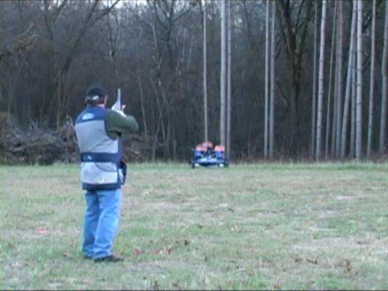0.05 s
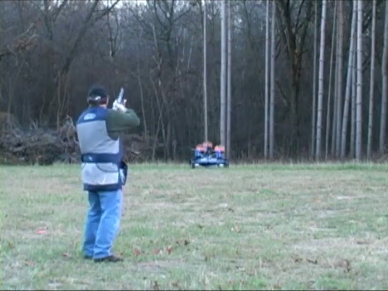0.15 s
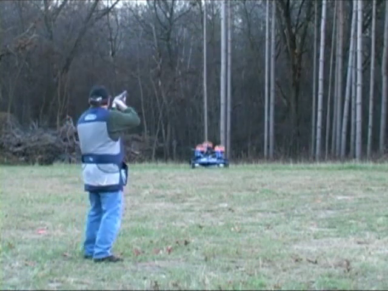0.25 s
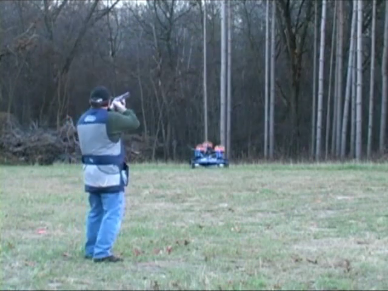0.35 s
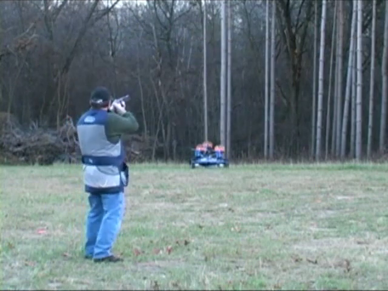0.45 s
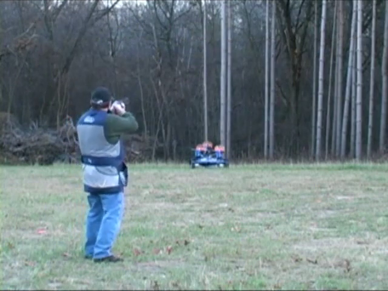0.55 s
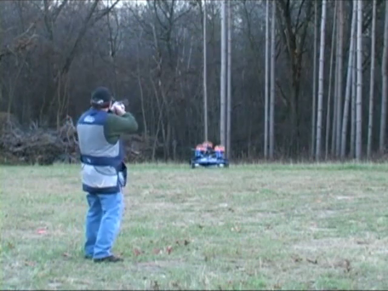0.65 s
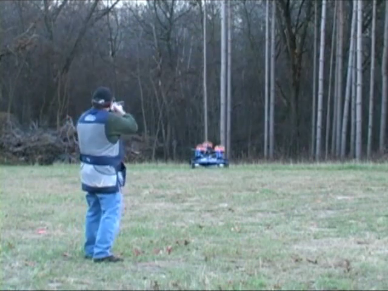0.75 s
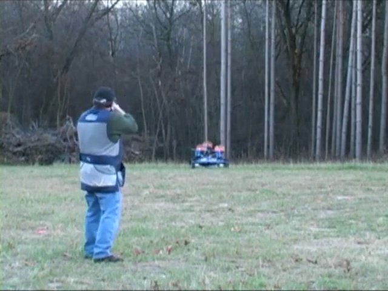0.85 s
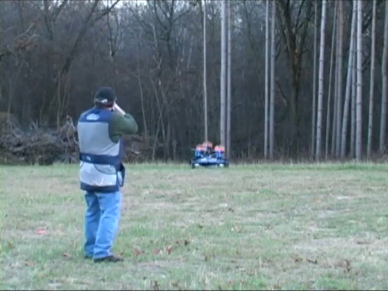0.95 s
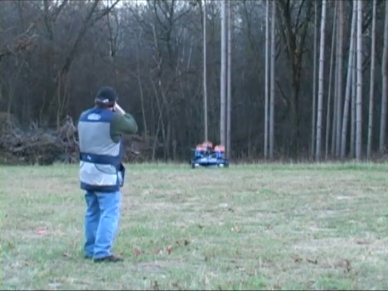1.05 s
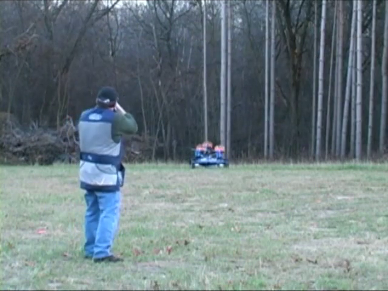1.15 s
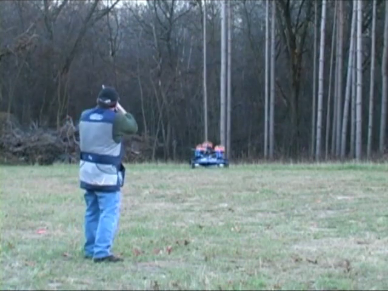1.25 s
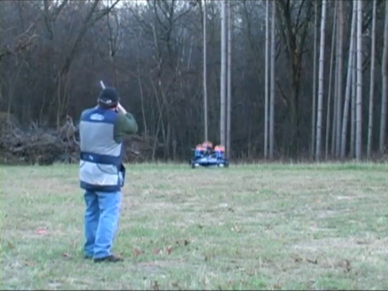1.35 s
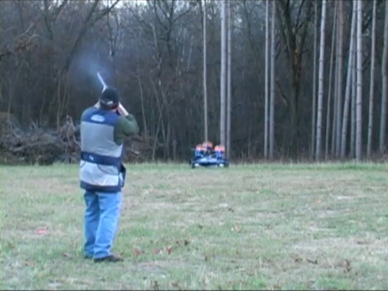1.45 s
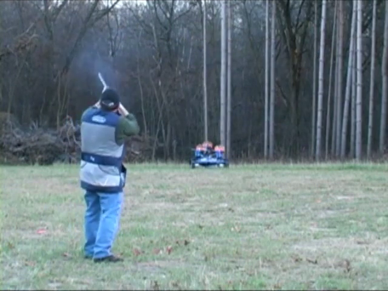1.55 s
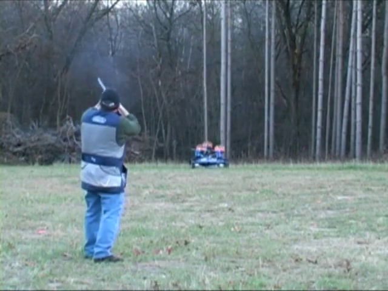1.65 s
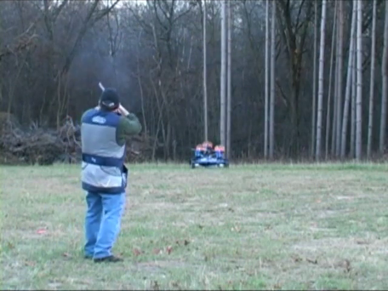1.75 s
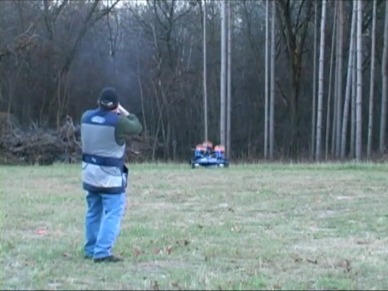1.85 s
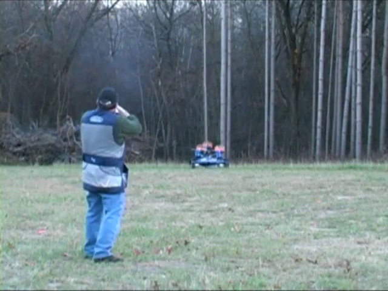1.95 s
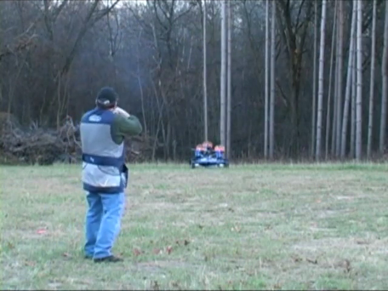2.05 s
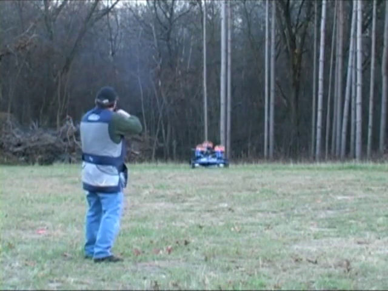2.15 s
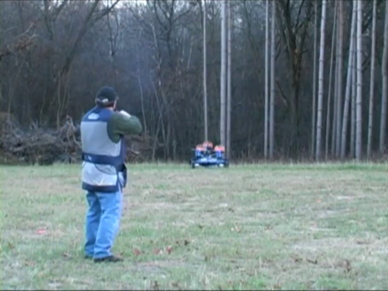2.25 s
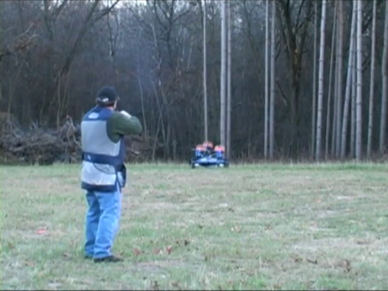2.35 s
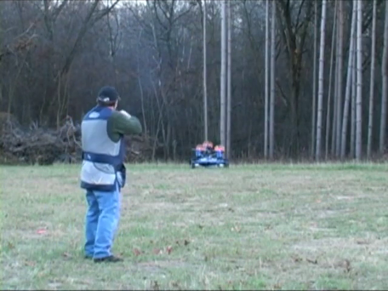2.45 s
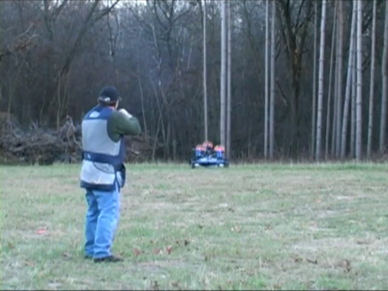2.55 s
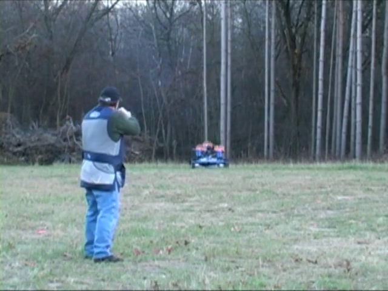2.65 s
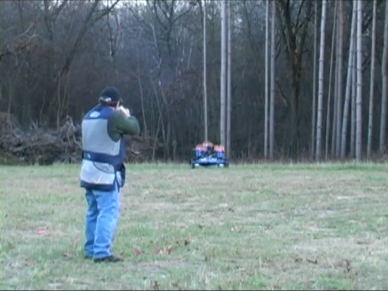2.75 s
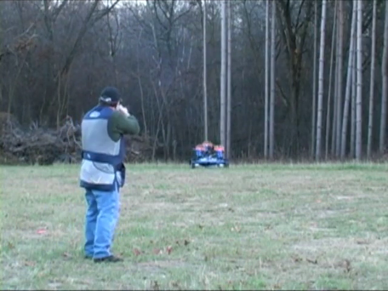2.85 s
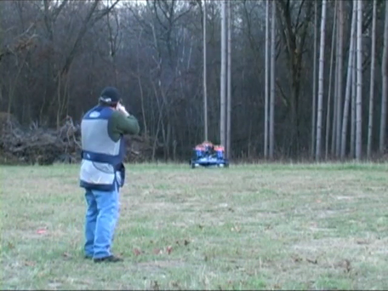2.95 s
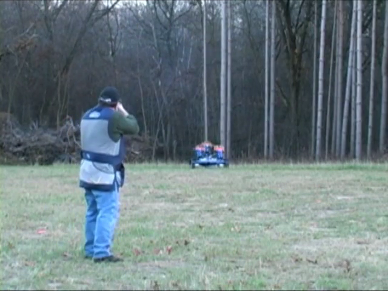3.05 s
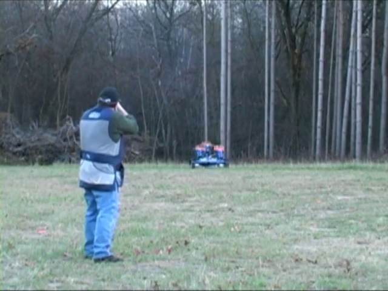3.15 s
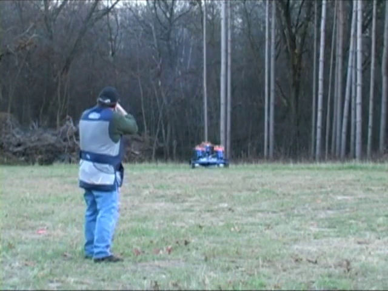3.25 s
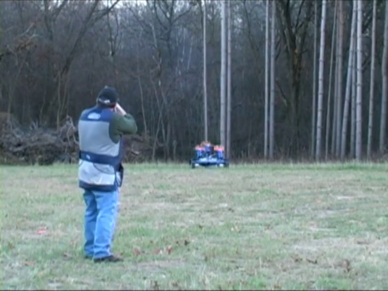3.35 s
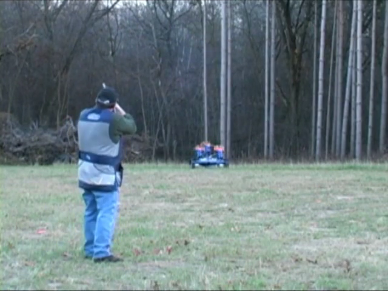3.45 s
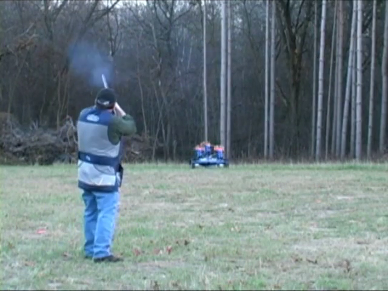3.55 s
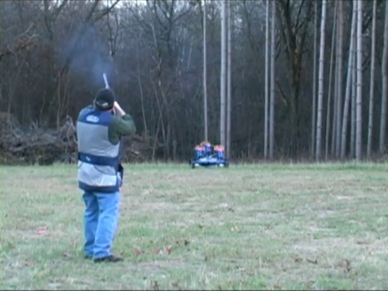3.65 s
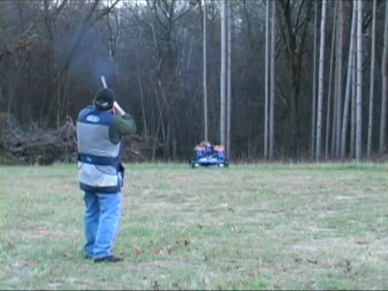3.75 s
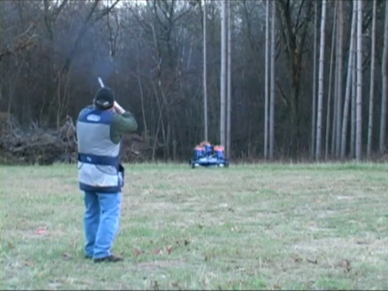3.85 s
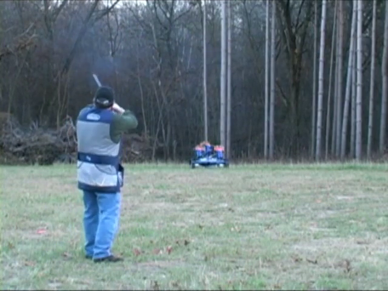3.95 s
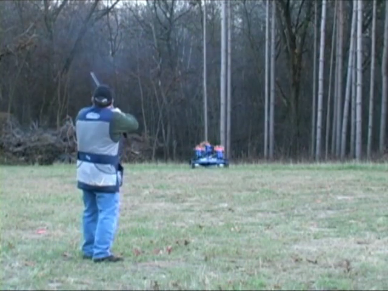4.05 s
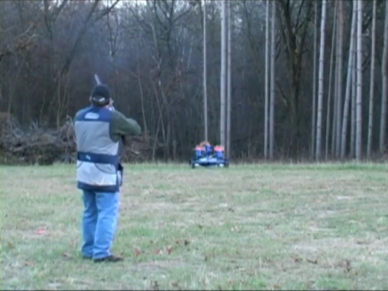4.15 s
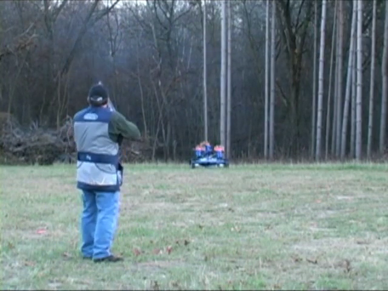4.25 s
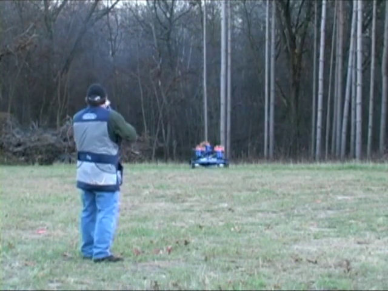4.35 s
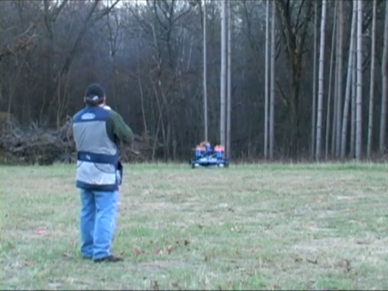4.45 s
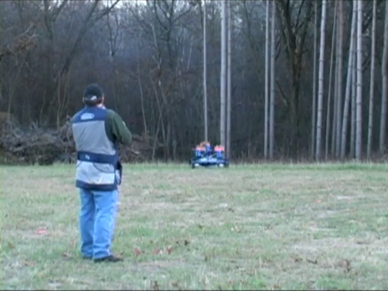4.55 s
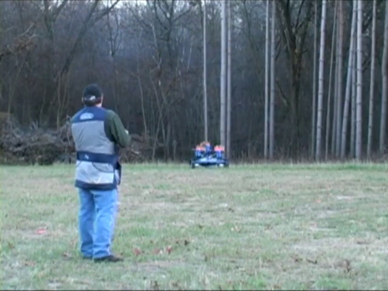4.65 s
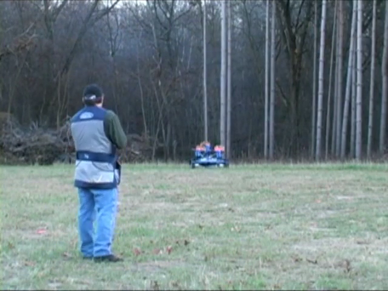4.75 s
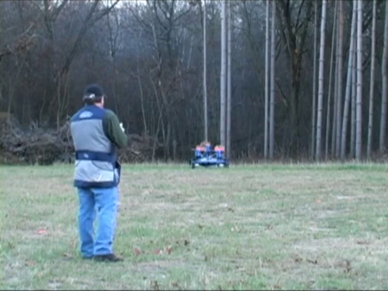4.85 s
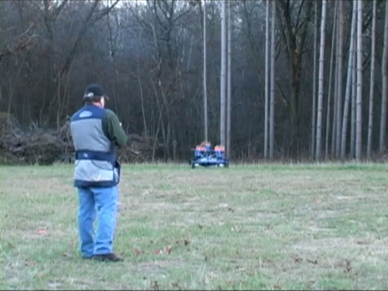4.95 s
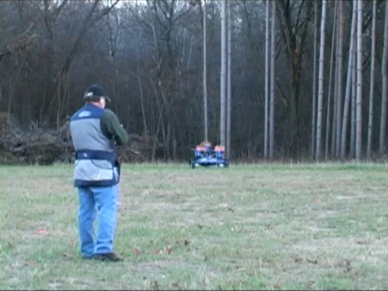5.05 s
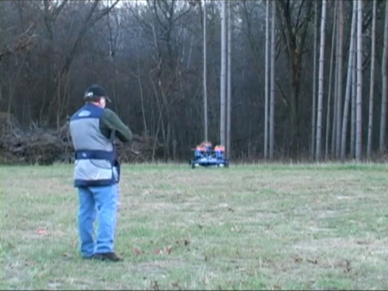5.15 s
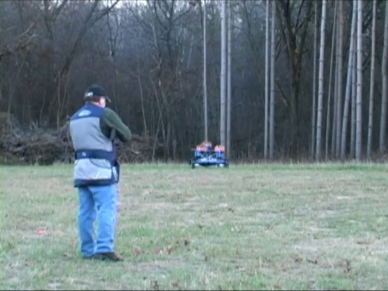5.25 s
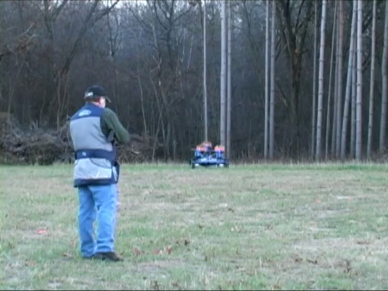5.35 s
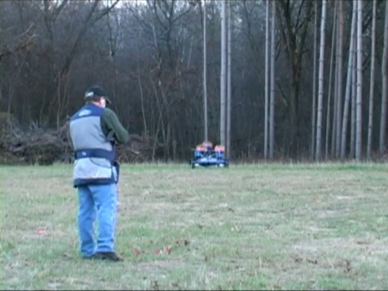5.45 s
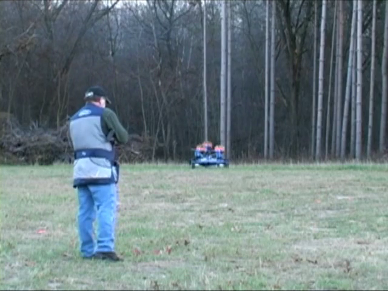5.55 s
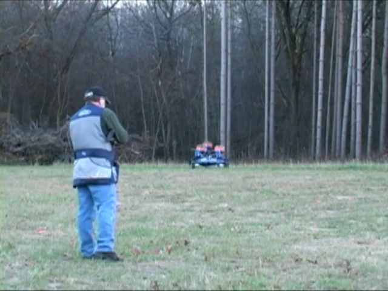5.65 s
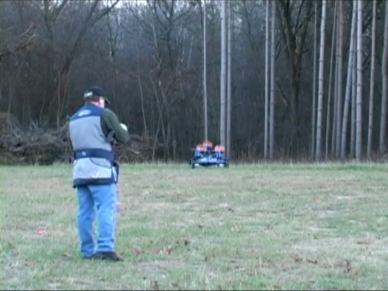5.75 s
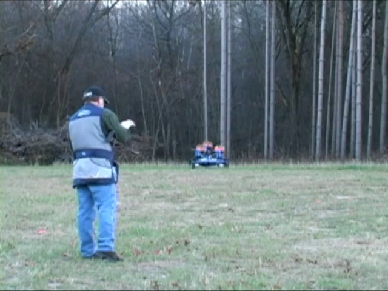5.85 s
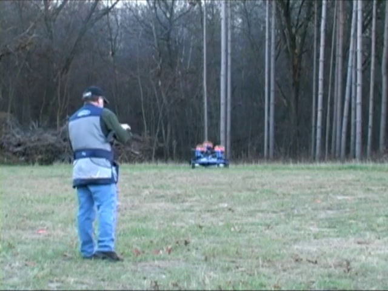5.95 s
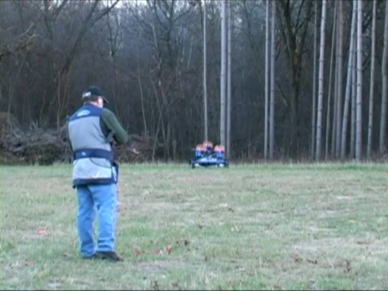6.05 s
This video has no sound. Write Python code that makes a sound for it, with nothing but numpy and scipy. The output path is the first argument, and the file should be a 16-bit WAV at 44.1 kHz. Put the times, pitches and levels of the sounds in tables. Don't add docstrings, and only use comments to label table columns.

```python
import sys
import numpy as np
from scipy import signal
from scipy.fft import rfft, irfft, next_fast_len
from scipy.io import wavfile
from scipy.ndimage import uniform_filter1d

SR = 44100
rng = np.random.default_rng(int(sys.argv[2]) if len(sys.argv) > 2 else 0)


def put_to_file(sound):
    columns = np.atleast_2d(sound).T
    safe = np.clip(columns, -1, 1)
    whole_steps = np.round(safe * 32767)
    wavfile.write(sys.argv[1], SR, whole_steps.astype(np.int16))


def boost(x):
    u = np.asarray(x, float) / 20
    return 10 ** u


N = 269391

# [t/s, blast level/dB, ring before it/dB, length of that ring/s]
SHOTS = [
    (1.5147, 1.5, -16.5, 0.0047),
    (3.6271, -3.5, -1.5, 0.0025),
]
# [centre f/Hz, width/Hz]
ROLL_HZ = [
    (230, 270),
    (870, 1000),
    (3000, 2500),
]
BANDS = 25 * 2 ** np.arange(0, 9.1, .5)


def read(table, hz):
    f, value = np.transpose(table)
    return np.interp(np.log(hz), np.log(f), value)


def unit(x):
    return x / np.sqrt(np.mean(x ** 2))


def band(x, hz, width, order=1):
    high = min(width / 2 + np.hypot(width / 2, hz), .47 * SR)
    low = min(hz ** 2 / high, high / 1.05)
    return signal.sosfilt(signal.butter(order, [low, high], "bandpass", fs=SR, output="sos"), x)


def split(spectrum, hz):
    bins = spectrum.shape[-1]
    first = int(hz / np.sqrt(2) * 2 * bins / SR) + 1
    last = min(int(hz * np.sqrt(2) * 2 * bins / SR), bins)
    inside = np.arange(first, last)
    octaves = np.log2(inside * SR / 2 / bins / hz)
    piece = np.zeros_like(spectrum)
    piece[:, inside] = spectrum[:, inside] * np.cos(np.pi * octaves) ** 2
    return unit(irfft(piece))


def add(out, x, s, pan_db=0.):
    i = int(s * SR)
    x = x[..., :N - i]
    out[:, i:i + x.shape[-1]] += x * boost(np.array([[pan_db], [-pan_db]]) / 2)


def grains(rate, spread_db, size):
    hit = rng.random((2, size)) < rate / SR
    return hit * rng.standard_normal((2, size)) * boost(spread_db * rng.exponential(size=(2, size)))


def stereo(pair, likeness):
    like = np.clip(likeness, 0, 1)
    middle = np.sqrt((1 + like) / 2) * pair[0]
    side = np.sqrt((1 - like) / 2) * pair[1]
    return middle + side * np.array([[1], [-1]])


def burst(hiss, hz, length, breadth):
    t = np.arange(len(hiss)) / SR
    shape = np.tanh(t / 0.00021) * np.exp(-(t / max(length, 2e-4)) ** 2)
    x = band(hiss * shape, hz, np.clip(breadth, .1, 3) * hz, order=2)
    return x / np.abs(x).max()


def blast(blast_db, lead_db, lead):
    t = np.arange(SR // 8) / SR - .01
    on = t > 0
    ring_shape = np.sin(np.pi * np.clip(t / lead + 1, 0, 1)) ** .5
    ring = boost(lead_db) * np.sin(2 * np.pi * 920 * t) * ring_shape
    rattle = stereo(unit(band(rng.standard_normal((2, len(t))), 2500, 6000)), 0.93)
    ahead = ~on * boost(-14) * np.exp(t / .003)
    overload = np.exp(-(t / 0.0042) ** 4) + boost(-10.5) * np.exp(-(t / 0.0064) ** 4)
    tail = boost(-22) * np.exp(-t / 0.075)
    shape = boost(blast_db) * on * overload + on * tail + ahead
    suction = -boost(-1.5) * on * np.sin(np.pi * np.clip(t / 0.0033, 0, 1))
    swing = boost(-15.5) * on * (1 - np.exp(-(t / .008) ** 4)) * np.exp(-np.abs(t / .023) ** 1.6)
    return ring + shape * rattle + suction + swing


def knocks(out, table, noise, length, later=0., breadth=1.2, thump_hz=230):
    t = np.arange(noise.shape[1]) / SR
    thump = np.sin(2 * np.pi * thump_hz * t) * np.tanh(t / 0.0021) * np.exp(-t / 0.0025)
    thump = boost(1.5) * band(thump, thump_hz, 400)
    smear_db = 0.2
    for (s, db, hz, thump_db, pan_db), hiss in zip(table, noise):
        echo = burst(hiss, hz, length * boost(smear_db * db), breadth)
        add(out, boost(db) * echo, s + later, pan_db)
        add(out, boost(db + thump_db) * thump, s + later)


def roll(after, slower):
    # [level/dB, time to fill/s]
    ground = [
        (-34, .004),
        (-34, .005),
        (-26.5, 0.13),
    ]
    # [level/dB, build/s, hold/s, fading/dB per s]
    depth = [
        (-22, 0.057, 0.14, 23),
        (-19, 0.11, 0.49, 23),
        (-20, 0.051, .21, 38.5),
    ]
    # [level/dB, fading/dB per s]
    far = [
        (-31.5, 9),
        (-27.5, 9.5),
        (-37, 14.5),
    ]
    inside = np.maximum(after - .2, 0)
    rows = []
    for near, trunks, slopes, (hz, width) in zip(ground, depth, far, ROLL_HZ):
        field_db, fill = near
        wood_db, build, hold, fading = trunks
        far_db, far_fading = slopes
        past = 0.078 * np.logaddexp(0, (inside - hold) / 0.082)
        field = boost(field_db - fading * past) * np.tanh((after / fill) ** 2)
        close = boost(wood_db - (fading - slower * np.log2(hz / 200)) * past)
        distant = boost(far_db - far_fading * after)
        trees = np.hypot(close, distant) * np.tanh(inside / build)
        rows.append(10 * np.log10((field ** 2 + trees ** 2 + 1e-9) / width))
    return np.array(rows)


def wood(out):
    # [f/Hz, level/dB]
    colour = [(30, -21.5), (60, -9.5), (120, -4.5), (240, 3.5), (450, -1.5), (900, 5.5), (1500, 2),
              (2200, 4.5), (3200, 1.5), (5000, 0), (8000, -1.5), (12000, -7)]
    # [f/Hz, likeness/0-1]
    likeness = [(85, 1), (125, 0.84), (250, 0.93), (500, 0.87), (1000, 0.83), (2000, 0.54), (4000, 1),
                (10000, 0.94)]
    # [f/Hz, left minus right/dB]
    lean = [(100, 0), (300, -1.4), (600, 1.5), (1200, 3.5), (2500, 2), (5000, 1.5)]
    # [f/Hz, share/0-1]
    repeat = [(250, .95), (800, .5), (3000, .2)]
    # [f/Hz, left leads by/radians]
    turn = [(0, -0.18), (260, -0.43), (690, -0.79), (1290, -0.35), (1810, -1.4), (2150, 0.015),
            (2840, -1.2), (4050, 0.079), (12100, 0.1)]
    # [roll level/dB, tilt/dB per octave, slower fading/dB per s and octave]
    aim = [
        (0.3, 0.15, 0.1),
        (-.3, 0.23, .5),
    ]
    # [t/s, boost/dB, centre f/Hz, reach/octaves, length/s]
    stands = [(1.674, 12.5, 700, 2.9, 0.021), (1.77, 12, 270, 0.8, 0.063), (1.894, -7, 700, 2.6, 0.019),
              (1.967, 6, 600, 0.9, 0.025), (1.998, 5.5, 700, 0.7, 0.022), (2.013, -10.5, 600, 1.5, .012),
              (2.296, 3, 267, 1.6, 0.045), (2.66, 6, 230, .8, .03), (3.798, 14.5, 890, 1.54, .014),
              (3.87, 10.5, 270, 0.91, 0.045), (4.002, -4, 200, 1.5, .015), (4.02, -3, 900, 2, 0.0082),
              (4.1, 8, 870, 0.44, 0.05), (4.144, -15, 700, 1.4, 0.0054), (4.23, 8.5, 1000, 1.2, 0.0059),
              (4.411, 6.5, 870, 0.55, 0.023), (4.438, -5, 700, 1.5, 0.0061), (4.555, 1, 500, 1.9, .03)]
    absorb_db, absorb_power, absorb_s = 3, 1.493, 1.22
    size = next_fast_len(int(1.25 * SR)) * 2
    after = np.arange(size) / SR
    step = np.arange(0, size / SR, .001)
    rate = 5000 + 15000 * after
    same = rfft(grains(rate, 2.54, size) / np.sqrt(rate))
    layer = np.log(np.array(ROLL_HZ)[:, 0])
    ends = [s for s, *_ in SHOTS[1:]] + [N / SR]
    for (s, *_), (aim_db, tilt_db, slower), end in zip(SHOTS, aim, ends):
        fresh = rfft(grains(rate, 1.88, size) / np.sqrt(rate))
        per_hz = roll(step, slower)
        for hz in BANDS:
            db = aim_db + tilt_db * np.log2(hz / 1000)
            for mix, row in zip(np.eye(len(layer)), per_hz):
                db = db + np.interp(np.log(hz), layer, mix) * row
            for when, boost_db, centre, reach, length in stands:
                in_pitch = np.log2(hz / centre) ** 2 / reach ** 2
                rise = np.where(s + step < when, 2.5, 1)
                in_time = np.abs(s + step - when) / length * rise
                db = db + boost_db * np.exp(-in_pitch - in_time)
            extra = max((hz / 1000) ** absorb_power - 3 ** absorb_power, 0)
            db = db - absorb_db * absorb_s * (1 - np.exp(-step / absorb_s)) * extra
            share = read(repeat, hz)
            echo = stereo(share * same + np.sqrt(1 - share ** 2) * fresh, read(likeness, hz))
            lead = np.interp(hz, *np.transpose(turn))
            echo = split(echo * np.exp(.5j * lead * np.array([[1], [-1]])), hz)
            gain = np.interp(after, step, boost(db + read(colour, hz) + 10 * np.log10(0.22 * hz)))
            add(out, gain * (s + after < end) * echo, s, read(lean, hz))


def thrower(out):
    # [t/s, level/dB]
    throw = [(0.54, -82), (0.57, -58.5), (0.613, -34), (0.634, -50.5), (0.684, -56), (0.72, -51),
             (0.91, -62.5), (1.05, -67), (1.1, -99.5)]
    # [t after the first/s, level/dB, hiss level/dB]
    throws = [
        (0, 0, -1),
        (2.189, 0.5, -10),
    ]
    # [f/Hz, width/Hz, level/dB]
    arm = [(3000, 700, -3), (3800, 800, -3), (4900, 450, 0), (5300, 90, -12), (7500, 1200, -7)]
    s, db = np.transpose(throw)
    t = s[0] + np.arange(int((s[-1] - s[0]) * SR)) / SR
    effort_db = np.interp(t, s, db)
    shake = boost(np.minimum(effort_db, db.max() - 9))
    sweep = boost(db.max() + 1.6 * (effort_db - db.max()))
    for later, throw_db, hiss_db in throws:
        grit = grains(2500, 1.17, len(t))
        ring = unit(sum(boost(d) * unit(band(grit, hz, w, order=2)) for hz, w, d in arm))
        swish = unit(band(grit[::-1], 5600, 5500, order=3))
        sound = shake * ring + boost(hiss_db) * sweep * swish
        add(out, boost(throw_db) * stereo(sound, 1.0), s[0] + later, 1.)


def action(out):
    # [t/s, peak level/dB, centre f/Hz, length/s, left minus right/dB]
    ticks = [(0.1346, -40.5, 2900, 0.0026, 11), (0.3595, -46, 3460, 0.0037, 11),
             (0.406, -38, 2690, 0.003, 14), (0.955, -43, 4700, 0.012, -1), (1.315, -40, 4030, 0.0053, 0.0),
             (1.341, -34.5, 3900, 0.011, -2), (2.782, -32, 4990, 0.004, -3),
             (5.1233, -31, 5200, 0.0092, -1), (5.1642, -34, 8550, 0.0035, -1),
             (5.372, -45, 4790, 0.004, -1), (5.528, -47, 3990, 0.0043, 19),
             (5.9589, -42.5, 3470, 0.0027, 25), (6.0541, -43, 4000, 0.011, 9)]
    # [t/s, peak level/dB, centre f/Hz, length/s, left
    # minus right/dB]
    clunks = [(0.1345, -43.5, 780, 0.0047, 2.3), (0.135, -45, 8350, 0.004, 2.3),
              (0.388, -41, 2700, 0.003, 8), (5.8605, -28, 1450, 0.0031, 0.5),
              (5.896, -30, 2360, 0.0032, 14)]
    # [t/s, peak level/dB, centre f/Hz, length/s, width over centre]
    soft_sounds = [(1.385, -53.5, 9000, 0.1, 0.23), (2.889, -41, 5440, .018, 0.44),
                   (3.446, -43, 5500, 0.023, 0.84), (3.47, -37, 4500, 0.023, 0.8),
                   (3.533, -36.5, 4130, 0.0084, 0.52), (3.539, -38, 3060, 0.027, 0.47),
                   (5.017, -42, 7000, 0.008, 0.63), (5.757, -41, 6040, 0.0026, .9),
                   (5.795, -48, 7200, 0.0033, 0.46), (5.891, -33, 4950, .007, 1.2),
                   (5.845, -44.5, 4900, .004, 0.23)]
    for table, breadth in (ticks, .87), (clunks, 0.5):
        for s, db, hz, length, pan_db in table:
            add(out, boost(db) * burst(rng.standard_normal(6000), hz, length, breadth), s, pan_db)
    for s, db, hz, length, breadth in soft_sounds:
        add(out, boost(db) * burst(rng.standard_normal(6000), hz, length, breadth), s)


def shell():
    # [f/Hz, level/dB, time to fall 60 dB/s]
    brass = [(3260, -0.5, 0.063), (7200, -22, 0.045), (9700, -24, .03)]
    t = np.arange(SR // 4) / SR
    settle = t - 0.081 * 0.003 * (1 - np.exp(-t / 0.0046))
    ring = 0
    for k, (hz, db, t60) in enumerate(brass):
        clock = t if k else settle
        ring = ring + boost(db) * np.sin(2 * np.pi * hz * clock) * 1000. ** (-t / t60)
    return boost(-30.5) * ring


def air():
    # [f/Hz, level/dB per Hz]
    colour = [(15, -53), (25, -26), (80, -1.5), (184, -7), (204, -9.5), (318, -14), (381, -27.5),
              (445, 10.5), (607, -21), (674, -16.5), (1950, -25), (4250, -27), (4960, -29.5), (12300, -34),
              (16000, -55.5), (22000, -120)]
    # [f/Hz, level/dB]
    motor = [(5028, -61.5), (5292, -66.5)]
    out, t = 0, np.arange(N) / SR
    white = rfft(rng.standard_normal((2, 2 * next_fast_len(N // 2 + 1))))
    knots = np.arange(0, N / SR + 1, .15)
    for hz in BANDS:
        drift = np.interp(t, knots, boost(0.6 * rng.standard_normal(len(knots))))
        likeness = read([(100, 0.14), (1000, 0.5), (8000, 0.52)], hz)
        hiss = stereo(split(white, hz)[:, :N], likeness)
        out = out + boost(read(colour, hz) + 10 * np.log10(hz)) * drift * hiss
    duck_db = sum(-6 * (t > s) * np.exp(-np.abs(t - s) / 0.57) for s, *_ in SHOTS)
    whine = sum(boost(db - 9.5) * unit(band(rng.standard_normal(N), hz, 45.0)) for hz, db in motor)
    return (unit(out) * boost(-49.5) + whine) * boost(duck_db)


def scene():
    # [t/s, peak level/dB, centre f/Hz, thump/dB, left minus right/dB]
    slaps = [(1.5517, 2.5, 3770, -1.5, 4), (1.565, -24, 2400, -5.5, 7.5), (1.569, -13.5, 2486, -12, 13),
             (1.605, -17.5, 1100, -7, 21), (1.631, -14.5, 2500, -11, 18), (1.646, -13, 3100, -8, -15),
             (1.658, -24, 1500, 3, 20), (1.6724, -6, 1640, -1, 2), (1.681, -6.5, 2080, -4, -12.5)]
    # [t/s, peak level/dB, centre f/Hz, thump/dB, left minus right/dB]
    trunks = [(1.777, -7.5, 2130, -10, -18), (1.814, -4, 3000, -26, -14), (1.822, -11, 1900, -16, 14),
              (1.864, -8.5, 2500, -28, -25), (1.878, -12, 1990, -18, 6), (3.717, -34, 1480, -15, 2),
              (3.888, -1.5, 3000, 3.5, 0.0), (3.926, -1.5, 2100, -22, -5), (3.94, 0, 2220, -5, -1),
              (3.989, -1, 2560, -2, -2), (4.039, -22, 1210, -16, -2), (4.162, -21, 1210, 6, 4),
              (4.236, -31, 1190, -5, -2)]
    out = air()
    thrower(out)
    action(out)
    add(out, shell(), 5.4555)
    slap = rng.standard_normal((len(slaps), 1500))
    for s, blast_db, lead_db, lead in SHOTS:
        add(out, blast(blast_db, lead_db, lead), s - .01)
        knocks(out, slaps, slap, .0031, later=s - SHOTS[0][0], breadth=1.0)
    knocks(out, trunks, rng.standard_normal((len(trunks), 1500)), 0.0016, breadth=0.97)
    wood(out)
    return out


def top_cut(x):
    return signal.sosfilt(signal.butter(12, 12520, fs=SR, output="sos"), x)


def record(dry):
    flat = np.clip(np.tanh(.8 * dry) / .8, -.9, .9)
    loudness = np.sqrt(np.abs(uniform_filter1d(np.mean(flat ** 2, axis=0), size=4000)))
    flat = flat + boost(-38) * loudness * rng.standard_normal(N)
    mix = signal.sosfilt(signal.ellip(8, .2, 70, 12150, fs=SR, output="sos"), flat)
    return top_cut(mix)


dry = scene()
out = record(dry)
put_to_file(out)
```